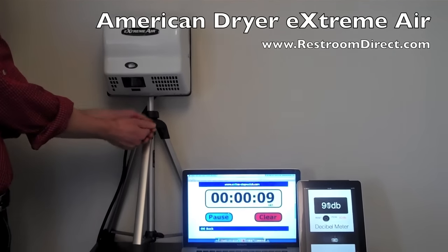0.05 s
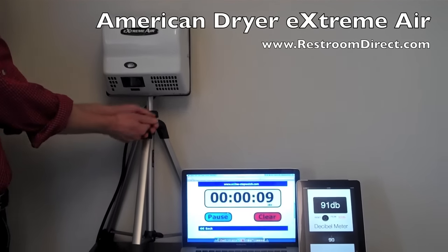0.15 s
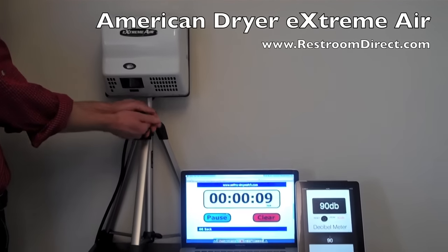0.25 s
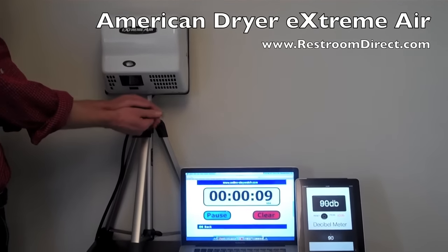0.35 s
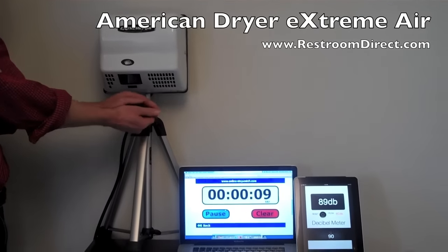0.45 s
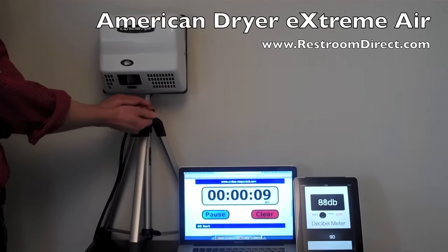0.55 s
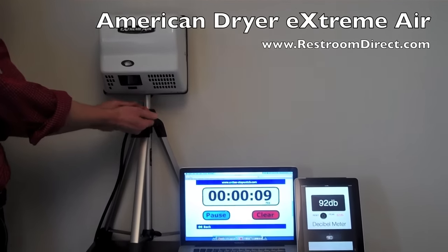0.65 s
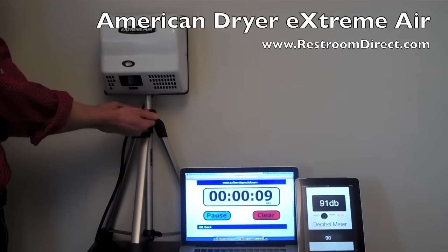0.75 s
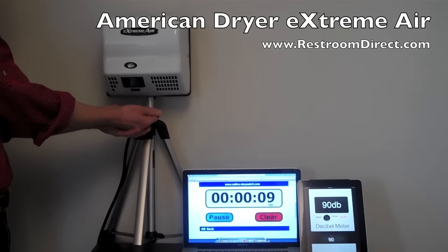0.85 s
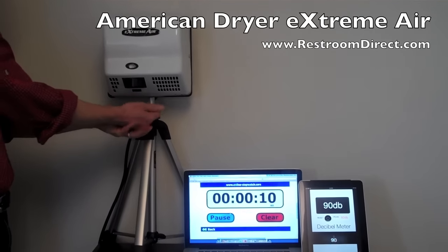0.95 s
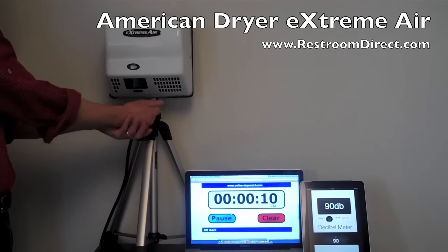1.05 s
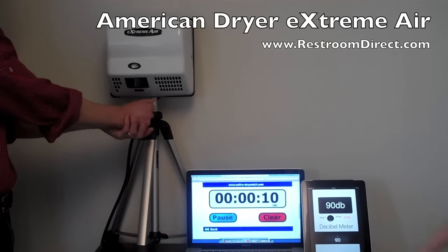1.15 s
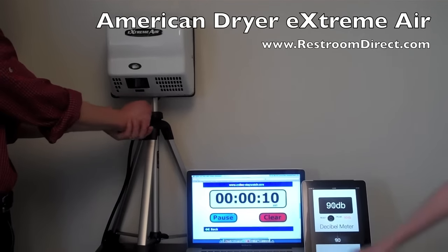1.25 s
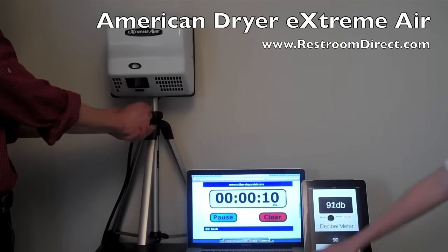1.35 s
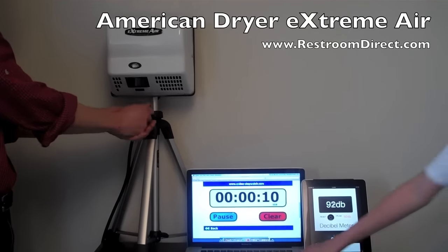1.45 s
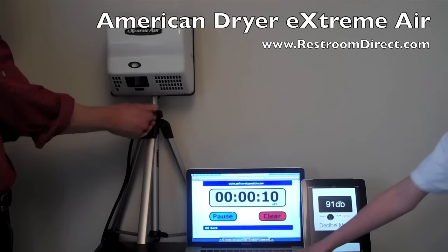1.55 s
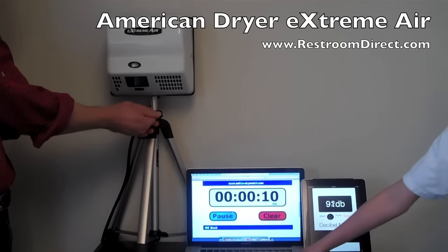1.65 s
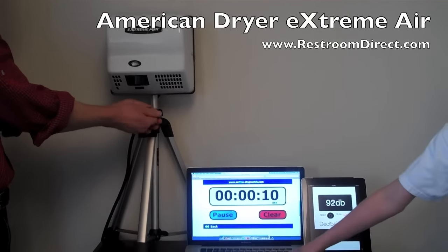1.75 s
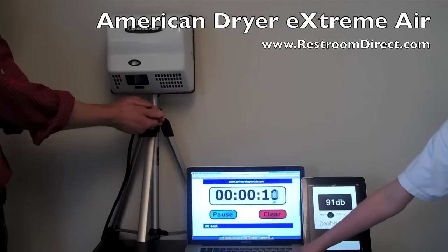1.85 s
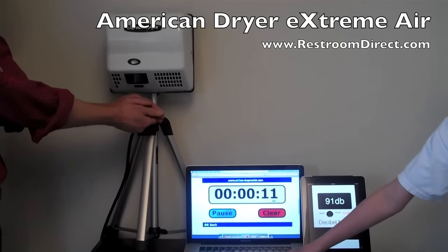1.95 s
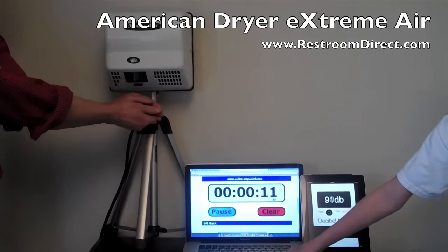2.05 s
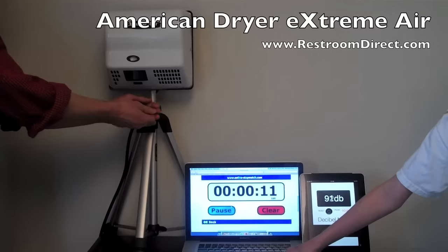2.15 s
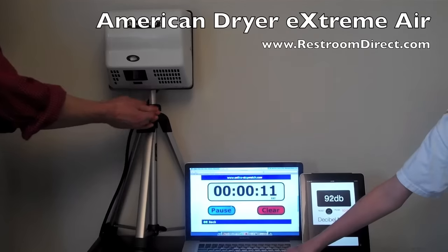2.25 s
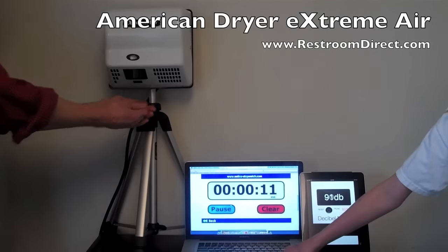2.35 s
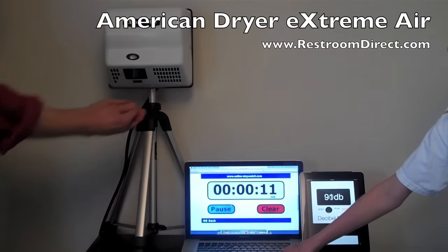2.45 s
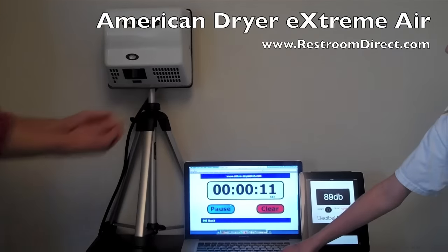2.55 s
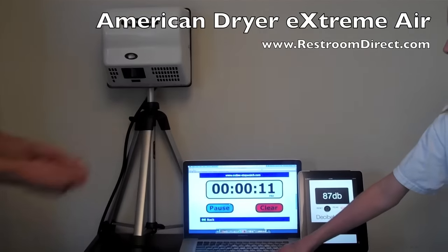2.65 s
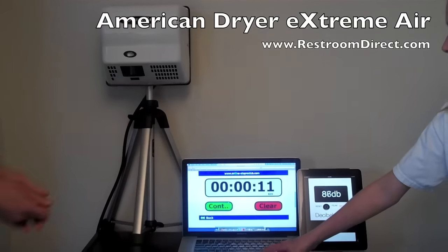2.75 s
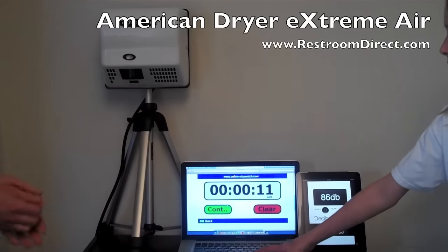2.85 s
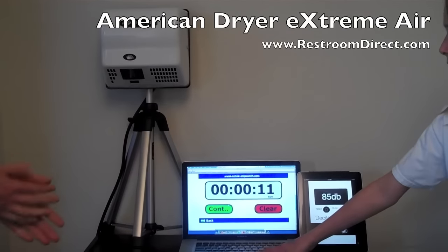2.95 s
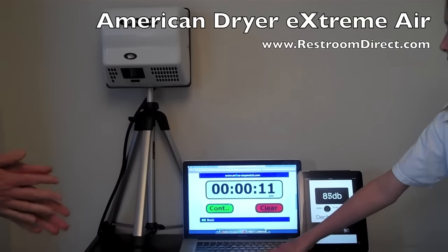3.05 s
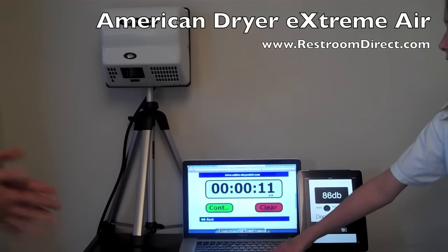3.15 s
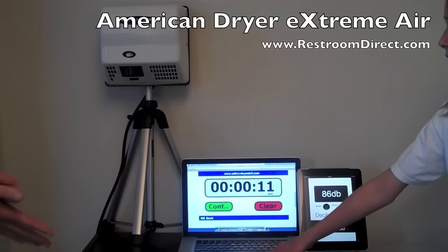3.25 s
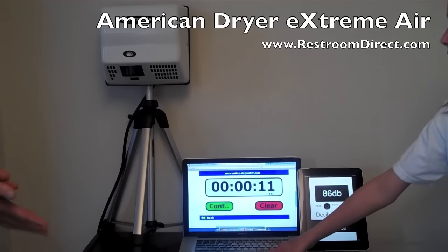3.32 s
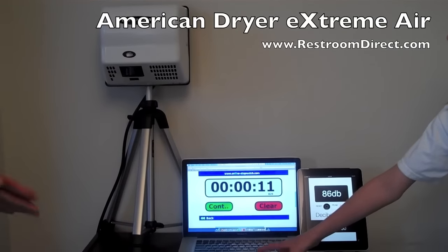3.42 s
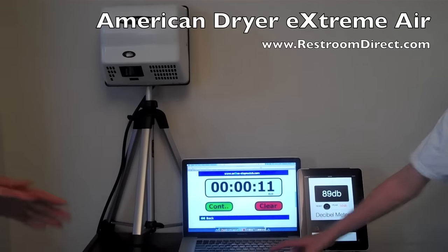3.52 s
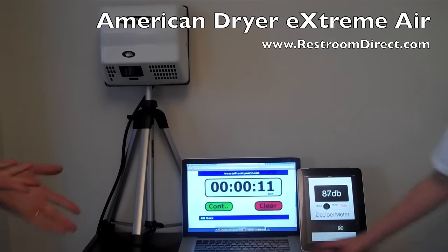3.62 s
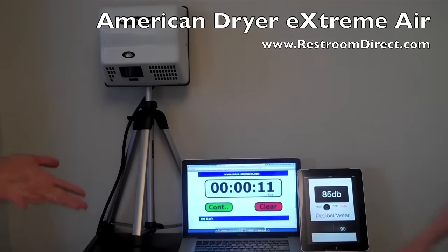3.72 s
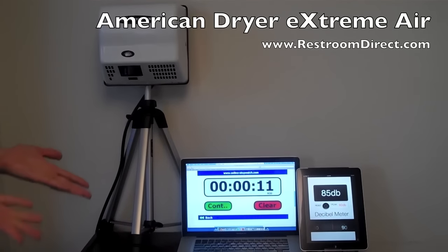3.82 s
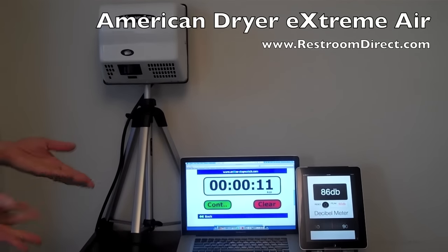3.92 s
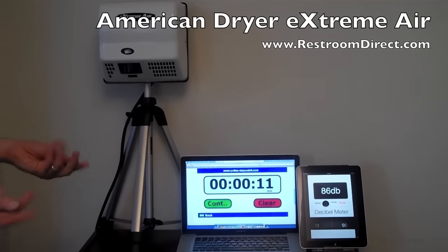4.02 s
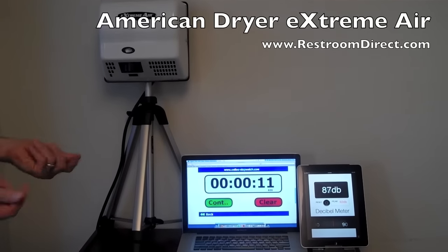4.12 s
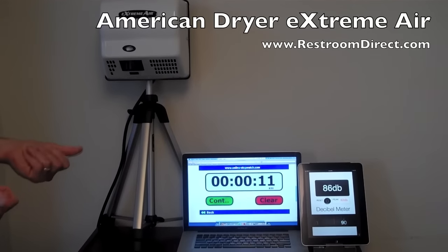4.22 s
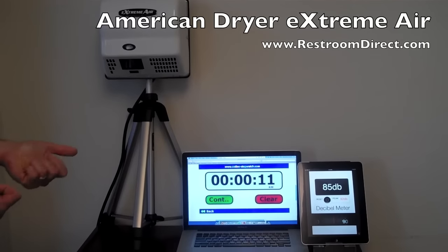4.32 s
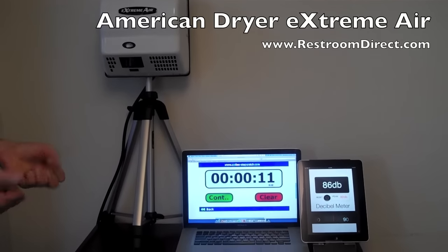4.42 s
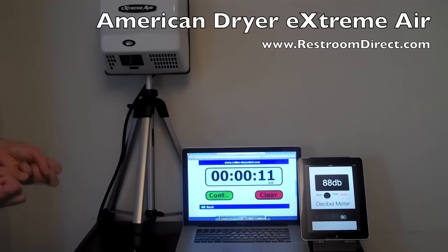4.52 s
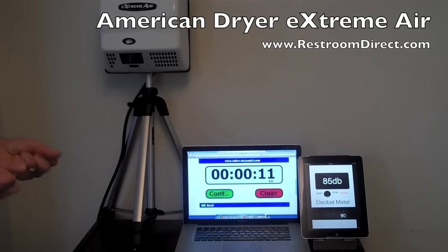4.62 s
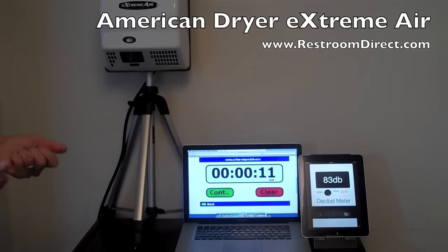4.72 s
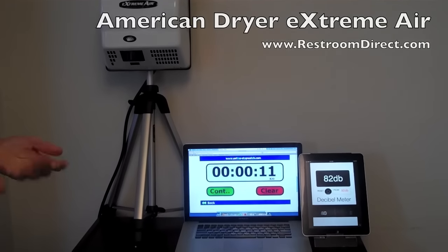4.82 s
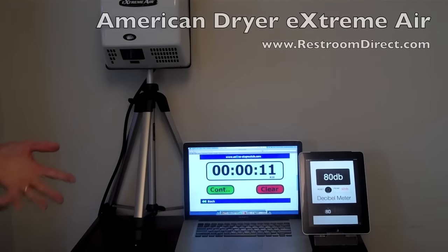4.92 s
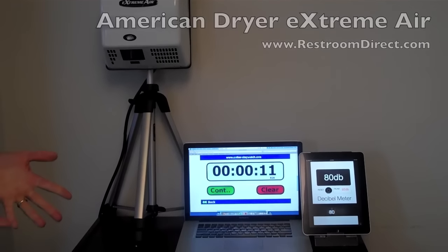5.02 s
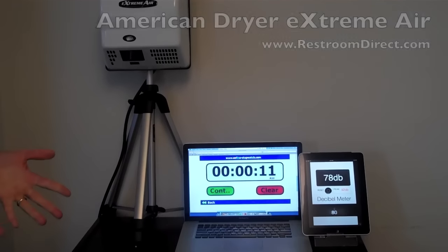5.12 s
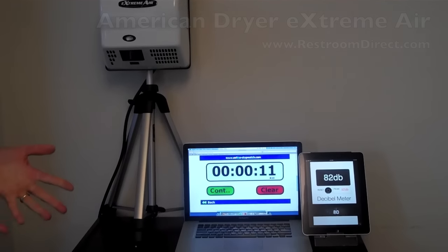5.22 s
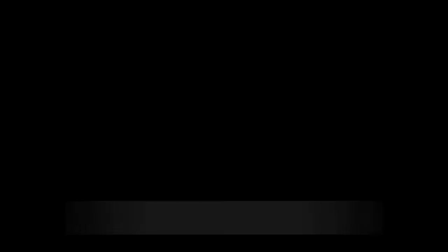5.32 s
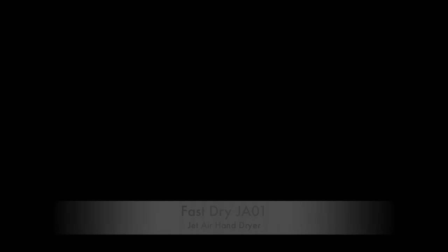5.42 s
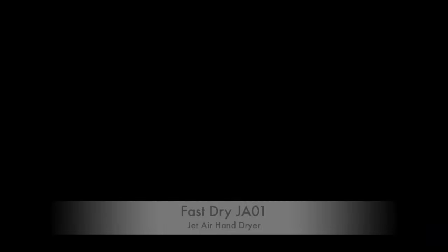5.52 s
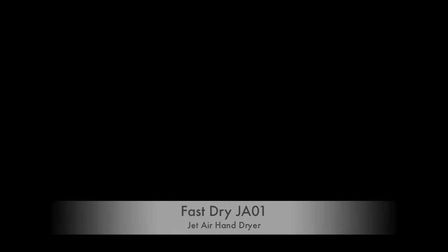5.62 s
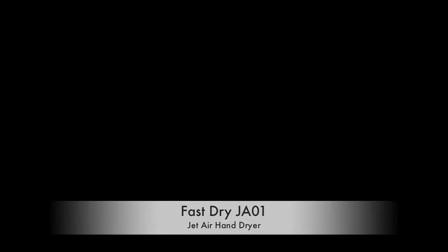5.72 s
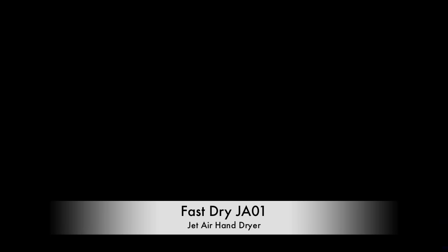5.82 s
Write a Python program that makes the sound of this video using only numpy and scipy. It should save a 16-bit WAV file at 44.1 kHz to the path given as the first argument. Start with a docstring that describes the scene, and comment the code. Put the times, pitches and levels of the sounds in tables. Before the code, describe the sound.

Hands rub in the loud, hissing, whistling jet of a hand dryer, which then blows freely, winds down and cuts off.

```python
"""Hand dryer in a small bare room

Hands rub in a high-speed jet: air splashes and fizzes on the skin, the hollow between the palms roars
and narrow gaps whistle. They leave, and the blower runs free: turbulent noise coloured by its housing,
with the whine of the blades. The rotor then coasts down, falling in pitch, until the sound is cut off."""
import sys
import numpy as np
from scipy import signal
from scipy.fft import rfft, irfft
from scipy.io import wavfile
from scipy.ndimage import uniform_filter1d

SR = 44100
rng = np.random.default_rng(int(sys.argv[2]) if len(sys.argv) > 2 else 0)


def dump(signal):
    """Clip the signal to [-1, 1] and save it as 16-bit WAV at the path in sys.argv[1]."""
    limited = np.clip(np.atleast_2d(signal).T, -1, 1)
    pcm = np.round(limited * 32767).astype(np.int16)
    wavfile.write(sys.argv[1], SR, pcm)


N = 258856

HOP, SIZE = 256, 2048  # step and length of a spectral frame, in samples
BLADES, FULL_TURNS_PER_S = 9, 390.6
POWER_OFF_S, CUT_S = 4.404, 5.3152


def hands_power(t, hz):
    """Cavity resonance and turbulence: the cupped palms ring while air splashes and fizzes on skin."""
    # Each row: time in seconds, splash level in dB, pitch of the hollow between the palms in Hz,
    # level of its roar in dB, level of the fizz at the finger edges in dB.
    gestures = [(0.0, -18, 1540, -34, -33.5), (0.07, -16, 1620, -14, -30.5), (0.2, -15, 1630, -24.5, -21),
                (0.43, -15, 1720, -29, -24), (0.5, -16.5, 1560, -18.5, -22.5),
                (0.53, -13.5, 1710, -19.5, -19), (0.61, -12.5, 1710, -12.5, -21),
                (0.75, -15, 1740, -15.5, -28), (0.95, -15, 2100, -18, -28.5), (1.13, -14, 2030, -19, -25.5),
                (1.26, -13.5, 1660, -21, -24), (1.38, -13, 1520, -20, -22.5), (1.46, -13, 1560, -21, -24.5),
                (1.64, -13, 1420, -16.5, -23), (1.74, -12, 1350, -18, -19.5), (1.95, -14, 1680, -16, -22),
                (2.06, -10, 1600, -17, -20), (2.18, -11.5, 1500, -22, -20), (2.22, -18, 1490, -16.5, -28),
                (2.31, -17, 1620, -15, -30), (2.36, -13, 1700, -21, -25.5), (2.42, -13.5, 1700, -19, -23),
                (2.465, -15.5, 1616, -23, -30.5)]
    # Air breaking on skin. Each row: frequency in Hz, relative spectral density in dB.
    splash_spectrum = [(100, -53.5), (250, -22), (500, -11.5), (800, -8), (1200, -6), (2000, -6.5),
                       (3500, -6.5), (5500, -11.5), (8000, -28.5), (13000, -51)]
    # Air passing the finger edges. Each row: frequency in Hz, relative spectral density in dB.
    fizz_spectrum = [(1500, -34), (3500, -4), (6000, -3.5), (10000, -5), (12000, -12), (13900, -35.5)]
    splash_db, hollow_hz, hollow_db, fizz_db = follow(gestures, t)
    mean_splash_db = np.mean([row[1] for row in gestures])
    overtone_db = -20.5 + 2.6 * (splash_db - mean_splash_db)  # a harder jet lifts the overtone
    hollow = band(hz, hollow_hz, sharpness=2.1)
    hollow += power_of(overtone_db) * band(hz, 1.7 * hollow_hz, sharpness=4)
    splash = unit_power(power_of(curve_at(splash_spectrum, hz)))
    nozzle_ring = power_of(-10) * band(hz, centre_hz=5400, sharpness=30)
    fizz = unit_power(power_of(curve_at(fizz_spectrum, hz))) + nozzle_ring
    roar = hollow * power_of(hollow_db) + splash * power_of(splash_db) + fizz * power_of(fizz_db)
    leaving = power_of(-340 * np.maximum(t - gestures[-1][0], 0))  # the hands' noise fades quickly as they withdraw
    return (roar + whistle_power(t, hz)) * leaving


def whistle_power(t, hz):
    """Flow-excited resonance: narrow gaps between the palms whistle, each gliding as it holds."""
    # Each row: start in seconds, length in seconds, level in dB, first and last pitch in Hz, sharpness.
    whistles = [(0.533, 0.083, -11.5, 2950, 3680, 1.8), (0.83, 0.11, -21.5, 2100, 2218, 7),
                (1.065, .1, -19, 2160, 2610, 5.4), (1.32, 0.085, -16.5, 1606, 1627, 9.9),
                (1.51, .04, -22, 1408, 1390, 9.6), (1.673, .27, -17.5, 1325, 1522, 7.1),
                (2.127, 0.069, -19.5, 1420, 1250, 9.1), (2.316, .02, -29, 1560, 1527, 8),
                (2.398, .04, -25.5, 1400, 1410, 8.7)]
    rise_db_per_s, fall_db_per_s = 450, 297
    power = 0
    for start, length, db, first_hz, last_hz, sharpness in whistles:
        before, after = np.maximum(start - t, 0), np.maximum(t - start - length, 0)
        level_db = db - rise_db_per_s * before - fall_db_per_s * after
        pitch_hz = np.interp(t, [start, start + length], [first_hz, last_hz])
        power += band(hz, pitch_hz, sharpness) * power_of(level_db)
    return power


def jet_power(t, hz):
    """Turbulent noise filtered by the housing; its treble fades fastest as the rotor slows."""
    # Free jet and intake at full speed. Each row: frequency in Hz, relative spectral density in dB.
    jet_spectrum = [(18, -82), (30, -37), (382, -12), (576, -12.5), (804, -4.5), (987, -10), (1340, -15.5),
                    (1740, -13), (2620, -14), (3390, -13), (4060, -15), (5380, -14.5), (5960, -18),
                    (10800, -22), (13900, -38)]
    # Housing and nozzle resonances. Each row: frequency in Hz, width in Hz, peak gain in dB.
    housing_modes = [(679, 28, 8.5), (740, 41, 5.5), (816.4, 23, 11), (937, 120, 3), (1190, 40, 2),
                     (1769, 75, 9), (1928, 65, 8.5), (3100, 150, 5.5), (3460, 67, 4), (4400, 70, 5),
                     (4876, 73, 7.5), (5120, 150, 5.5), (5350, 340, 5.5), (6510, 130, 6.5),
                     (7940, 150, 3.5)]
    # Each row: frequency in Hz, loss in dB per tenfold drop in rotor speed.
    speed_law = [(100, 39.5), (800, 40), (3000, 43), (6000, 54), (12000, 84)]
    shape = unit_power(power_of(curve_at(jet_spectrum, hz) + resonances_db(housing_modes, hz)))
    level_db = -19.5 + curve_at(speed_law, hz) * np.log10(rotor_speed(t) / FULL_TURNS_PER_S)
    shade_db = -nozzle_cover(t) * (0.5 + 2.8 * peak(hz, 805, sharpness=9))  # palms damp the drone
    return shape * power_of(level_db + shade_db)


def airflow():
    """Incoherent sources add in power: jet and hands form one noise, partly alike in both channels."""
    # Each row: frequency in Hz, left-right coherence from 0 to 1.
    coherences = [(25, .6), (60, 1), (130, 0.99), (280, 0.98), (610, 0.98), (1320, 0.83), (2870, 0.59),
                  (6220, 0.3), (13500, 0.47)]
    # Each row: frequency in Hz, level of left over right in dB.
    balances = [(60, -6), (110, -1), (200, 0.5), (360, -2.5), (670, -1.0), (1210, -1.5), (2220, -1.5),
                (4040, -3), (7380, 0.5), (13500, -1.5)]
    # Each row: frequency in Hz, phase lead of the left in radians.
    phase_leads = [(100, .02), (1500, .05), (3500, 0.74), (7000, 0.65), (13000, .3)]
    frames, hz = N // HOP + SIZE // HOP + 1, np.fft.rfftfreq(SIZE, 1 / SR)[:, None]
    t = np.arange(frames) * HOP / SR
    left_re, left_im, own_re, own_im, patches = rng.standard_normal((frames, len(hz), 5)).T
    patches = uniform_filter1d(patches, size=24, axis=0)  # turbulent patches spread over frequency
    patches = unit_rms(uniform_filter1d(patches, size=16, axis=1))  # and over time
    flutter_db = .8 * patches + .76 * wander(t, 1.294, 12)
    amplitude = np.sqrt(jet_power(t, hz) + hands_power(t, hz)) * gain_of(flutter_db)
    coherence = curve_at(coherences, hz)
    left = left_re + 1j * left_im
    right = coherence * left + np.sqrt(1 - coherence ** 2) * (own_re + 1j * own_im)
    right *= np.exp(-1j * curve_at(phase_leads, hz))
    lean = gain_of(curve_at(balances, hz) / 2)
    spectra = np.array([left * lean, right / lean]) * amplitude
    overlap_gain = np.sqrt(SIZE / HOP * 3 / 8)
    return overlap_gain * signal.istft(spectra, nperseg=SIZE, noverlap=SIZE - HOP)[1][:, :N]


def rotor_whine():
    """Periodic forcing: tones at the blade-passing and shaft rates, wavering in level and speed."""
    # Resonances and dead spots that the falling tones cross.
    # Each row: frequency in Hz, width in Hz, gain in dB.
    swells = [(352, 36, 19), (3330, 70, -9), (3165, 60, -8), (2980, 160, 6), (2855, 50, -8), (2770, 80, 16),
              (2200, 70, 13)]
    t = np.arange(N) / SR
    frame_t = t[::HOP]
    speed = rotor_speed(t)
    speed_decades = np.log10(speed / FULL_TURNS_PER_S)
    blade_db = -34 + 105 * speed_decades + resonances_db(swells, BLADES * speed)
    hum_db = -47 + 75 * speed_decades + resonances_db(swells, speed) - 5.5 * nozzle_cover(t)
    jitter = .0006 * np.interp(t, frame_t, wander(frame_t, .7, 15))
    turns = np.cumsum(speed * (1 + jitter)) / SR
    tones = np.zeros((2, N))
    for harmonic, db, lead_rad in ((BLADES, blade_db, .6), (1, hum_db, .05)):
        for side in range(2):
            waver_db = 3 * np.interp(t, frame_t, wander(frame_t, 1.5, 25))
            phase = 2 * np.pi * harmonic * turns - side * lead_rad
            tones[side] += np.sqrt(2) * gain_of(db + waver_db) * np.sin(phase)
    return tones * gain_of([[.7], [-.7]])  # slightly louder on the left


def rotor_speed(t):
    """Shaft turns per second: nearly steady under power, then slowed by air drag."""
    sag_turns_per_s2, drag_per_s = .14, .666
    return (FULL_TURNS_PER_S - sag_turns_per_s2 * t) / (1 + drag_per_s * np.maximum(t - POWER_OFF_S, 0))


def nozzle_cover(t):
    """Share of the nozzle that the palms cover."""
    return np.clip((2.45 - t) / 0.5, 0, 1)


def room(x):
    """Standing waves and the comb of dense wall echoes, as a minimum-phase filter for each channel."""
    # Each row: frequency in Hz, width in Hz, peak gain in dB.
    room_modes = [(95, 25, 3), (155, 25, 3), (200, 22, 4), (255, 25, 4), (330, 30, 3), (390, 18, 4),
                  (491, 25, 3), (650, 30, 3), (808, 20, 3), (1150, 25, 5), (1243, 22, 5), (1305, 25, 4),
                  (1408, 18, 7), (1480, 25, 3), (1583, 25, 5), (1620, 20, 3), (1834, 45, 3), (2055, 35, 3),
                  (2105, 25, 3), (2198, 35, 4), (2306, 22, 3), (2455, 22, 4), (2655, 18, 5), (2870, 40, 3),
                  (5378, 50, 5), (5452, 30, 4)]
    hz = np.fft.rfftfreq(8 * SIZE, 1 / SR)
    ripples = unit_rms(uniform_filter1d(rng.standard_normal((3, len(hz))), size=6, axis=1))
    shared, own = ripples[:1], ripples[1:]
    comb_db = (2.2 * shared + own) * np.clip(hz / 2800, .3, 1)
    log_gain = np.log(gain_of(resonances_db(room_modes, hz) + comb_db - 2))
    two_sided = np.concatenate([log_gain, log_gain[:, -2:0:-1]], axis=1)
    response = np.fft.ifft(np.exp(np.conj(signal.hilbert(two_sided)))).real
    return signal.oaconvolve(x, response, axes=1)[:, :N]


def resonances_db(modes, hz):
    """Lorentzian peaks and dips, in dB, on a flat response."""
    return sum(db / (1 + (2 * (hz - f) / width) ** 2) for f, width, db in modes)


def peak(hz, centre_hz, sharpness):
    """Power response of two like resonators in series, 1 at the centre."""
    return 1 / (1 + ((hz / centre_hz - centre_hz / (hz + 1)) * sharpness) ** 2) ** 2


def band(hz, centre_hz, sharpness):
    """A resonance band of total power 1."""
    return unit_power(peak(hz, centre_hz, sharpness))


def wander(t, low_hz, high_hz):
    """Slow fluctuation of rms 1: a superposition of sines in random phase."""
    rates_hz = np.geomspace(low_hz, high_hz, num=24)
    return unit_rms(sum(np.sin(2 * np.pi * (f * t + rng.random())) / np.sqrt(f) for f in rates_hz))


def curve_at(points, hz):
    """A table interpolated on a logarithmic frequency axis."""
    f, value = np.transpose(points)
    return np.interp(np.log(hz + 1), np.log(f + 1), value)


def follow(rows, t):
    """The columns of a table interpolated at the times t."""
    times, *columns = np.transpose(rows)
    return [np.interp(t, times, column) for column in columns]


def gain_of(db):
    return 10 ** (np.asarray(db) / 20)


def power_of(db):
    return gain_of(2 * db)


def unit_rms(x):
    return x / np.sqrt(np.mean(x ** 2) + 1e-20)


def unit_power(power):
    return power / power.sum(0)


def scene():
    """Superposition of the air noise, coloured by the room, and the rotor tones."""
    return room(airflow()) + rotor_whine()


def record(dry):
    """Soft saturation, thinned bass and slightly dulled top treble, an abrupt stop and a band limit."""
    # Each row: frequency in Hz, gain in dB.
    tone_curve = [(20, -4.5), (50, -12.5), (100, -3.5), (160, -1.5), (300, -2.1), (10500, -0.45),
                  (11600, -0.5), (12300, -2.5), (13300, -2.5)]
    rounded = 1.3 * np.tanh(dry / 1.3)
    tone_gain = gain_of(curve_at(tone_curve, np.fft.rfftfreq(N, 1 / SR)))
    coloured = np.clip(irfft(rfft(rounded) * tone_gain, N), -1, 1)
    since_cut = np.arange(N) / SR - CUT_S
    dip = gain_of(-600 * np.maximum(since_cut + .01, 0))  # the last 10 ms before the cut
    faint_tail = gain_of(-26 - 1500 * since_cut) * (since_cut < .025)
    gate = np.where(since_cut < 0, dip, faint_tail)
    low_pass = signal.firwin(511, cutoff=13950, window=("kaiser", 9), fs=SR)
    return signal.oaconvolve(coloured * gate, low_pass[None], "same")


dry = scene()
out = record(dry)
dump(out)
```